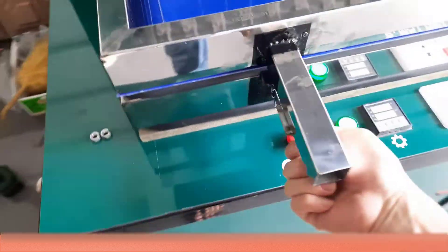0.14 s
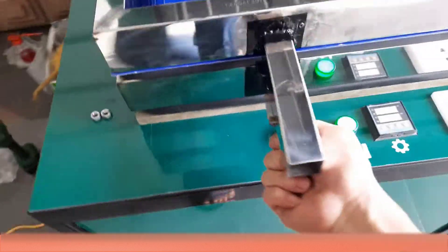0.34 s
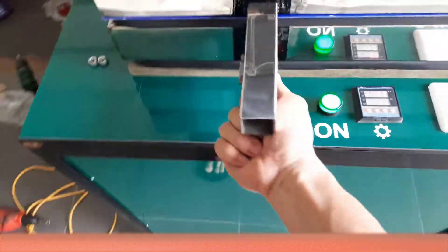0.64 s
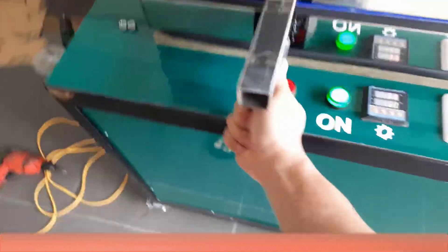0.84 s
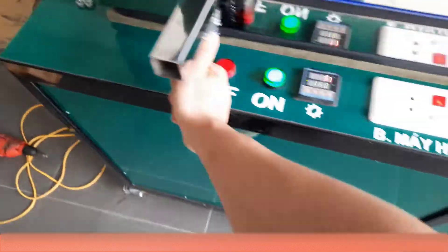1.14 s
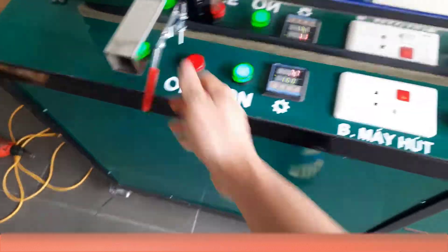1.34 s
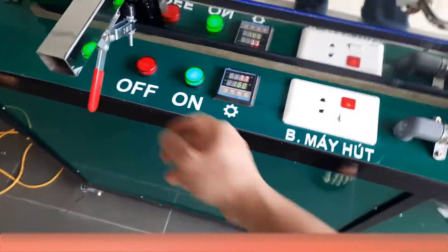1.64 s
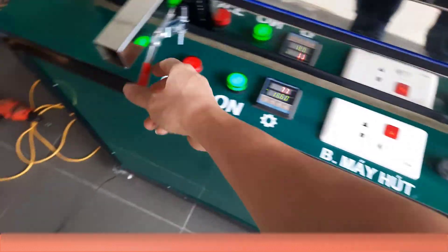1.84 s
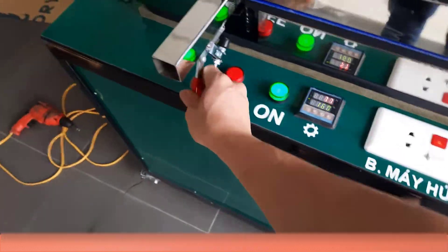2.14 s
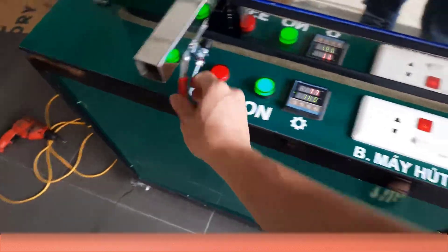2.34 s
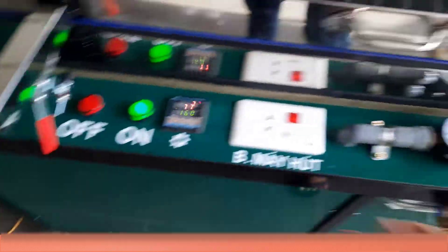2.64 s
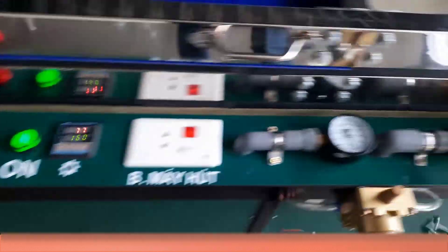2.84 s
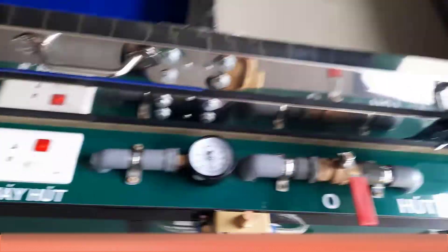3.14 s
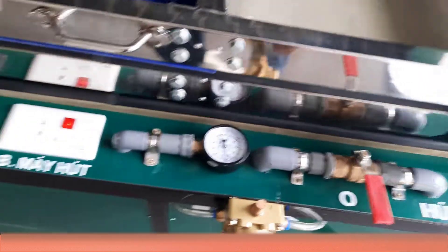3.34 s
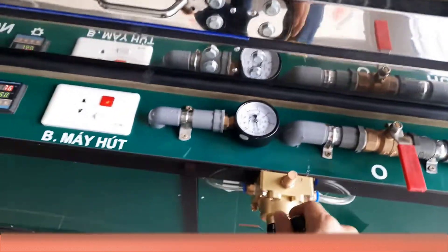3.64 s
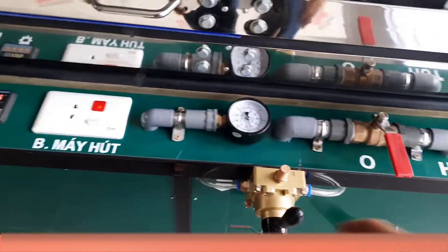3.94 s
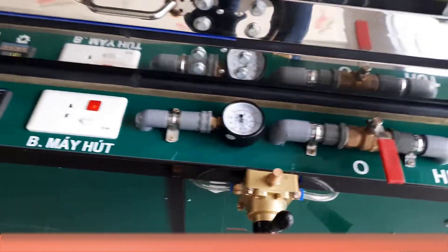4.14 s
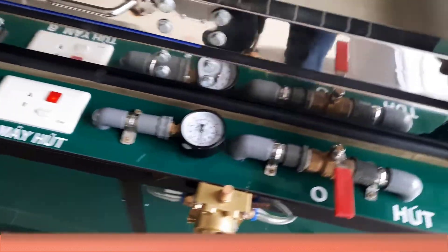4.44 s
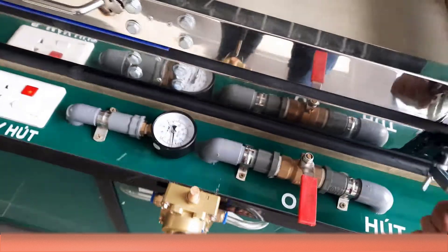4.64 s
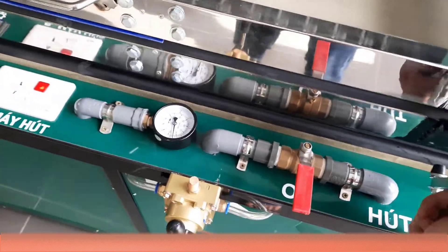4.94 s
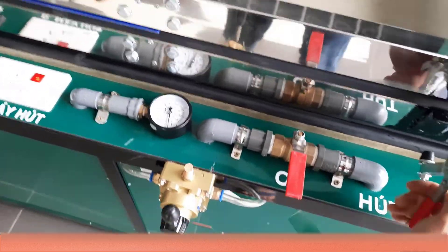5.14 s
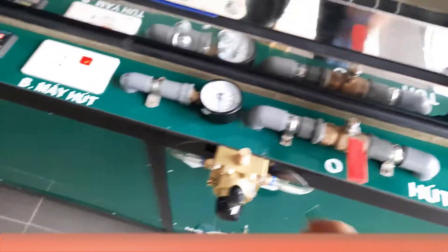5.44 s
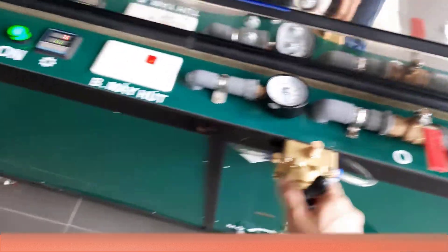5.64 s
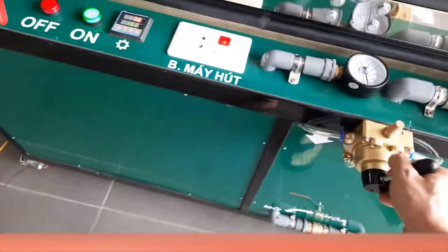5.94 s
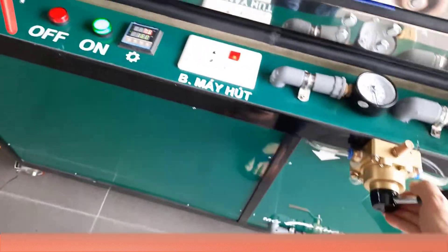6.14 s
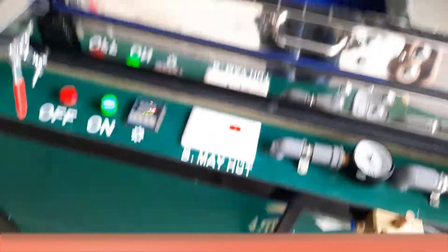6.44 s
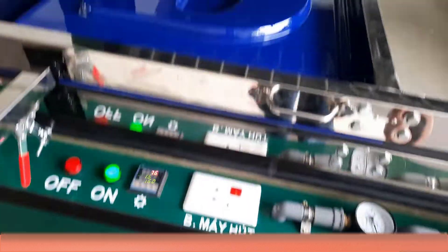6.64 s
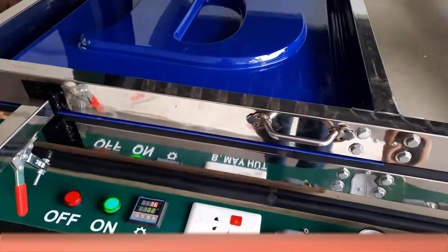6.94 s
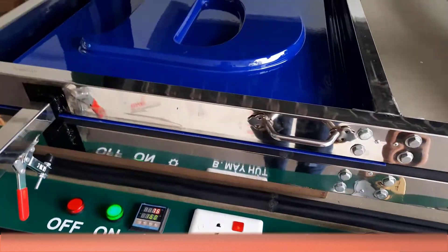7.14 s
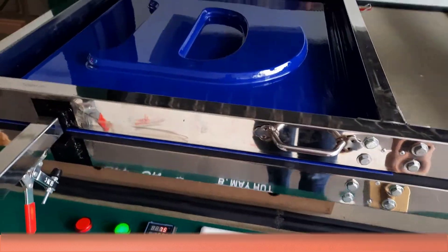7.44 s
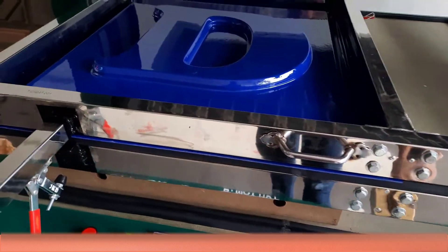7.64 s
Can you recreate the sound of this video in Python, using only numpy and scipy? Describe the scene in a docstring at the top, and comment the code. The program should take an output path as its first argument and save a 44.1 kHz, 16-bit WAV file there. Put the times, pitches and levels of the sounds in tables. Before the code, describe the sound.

A workshop hums with low machine rumble and fan rush, slightly left; a motor hum slowly grows. From 0.2 s come soft puffs of thin hiss and light metal ticks. At 0.78 s a steel frame slams hard, ringing, shuddering low and chattering until about 1.1 s, followed by latch knocks, rubbing and tiny squeaks to 1.45 s, and a faint knock at 1.57. At 2.75 s a valve thumps and compressed air blasts out, roaring and buffeting the close microphone, stopping abruptly at 3.53. A thump and click follow at 3.63, a lesser click at 3.92, a sharp ringing fitting click at 4.64. The ducked background slowly returns. Faint bumps, rubs and puffs run from 5.3 to 6.15. At 6.2 s a bright, steady air jet opens with a tiny toot and hisses to the end at 7.8, its colour shifting as the microphone swings away, with gusts on it.

```python
"""Clamping frame and compressed air

In a workshop a steel clamping frame is shut on a forming machine and latched with a lever: struck metal modes.
A valve thumps and lets out a blast of air, a fitting clicks, soft puffs of thin hiss come and go, then a
brass valve opens into a steady jet: all the air is shaped noise. It buffets the two-port microphone held
close by, whose gain control ducks the workshop after the blast and slowly lets it back."""
import sys
import numpy as np
from scipy import signal
from scipy.fft import rfft, irfft, next_fast_len
from scipy.io import wavfile
from scipy.ndimage import uniform_filter1d, minimum_filter1d, map_coordinates

SR = 44100
rng = np.random.default_rng(int(sys.argv[2]) if len(sys.argv) > 2 else 0)


def transcribe(signal):
    """Save signal, clipped to [-1, 1], as a 16-bit WAV file at the path in sys.argv[1]."""
    frames = np.atleast_2d(signal).T
    limited = np.clip(frames, -1, 1)
    pcm = np.round(limited * 32767).astype(np.int16)
    wavfile.write(sys.argv[1], SR, pcm)


N = 343539
TIME = np.arange(N) / SR


def from_db(db):
    """Decibels to gain."""
    return np.exp(np.asarray(db) * (np.log(10) / 20))


def rms_one(x):
    """Scale to unit power."""
    return x / np.sqrt(np.mean(x ** 2) + 1e-20)


def in_time(rows):
    """Each column of a curve, interpolated at every sample."""
    s, *columns = np.transpose(rows)
    return [np.interp(TIME, s, column) for column in columns]


def at_hz(points, hz):
    """Read a table on a log-frequency axis."""
    table_hz, value = np.transpose(points)
    return np.interp(np.log(np.maximum(hz, 1)), np.log(table_hz), value)


def colour(x, spectrum):
    """Filter by a table of (frequency [Hz], gain [dB])."""
    length = x.shape[-1]
    size = next_fast_len(length)
    gain = from_db(at_hz(spectrum, np.fft.rfftfreq(size, 1 / SR)))
    return irfft(rfft(x, size) * gain, size)[..., :length]


def noise(spectrum, alike=0):
    """Coloured stereo noise of unit power with a share common to both sides."""
    size, alike = next_fast_len(N, real=True), np.clip(alike, 0, 1)
    pairs = rng.standard_normal((3, size // 2 + 1, 2), dtype=np.float32)
    white = pairs.view(np.complex64)[..., 0]
    gain = from_db(at_hz(spectrum, np.fft.rfftfreq(size, 1 / SR)))
    mixed = np.sqrt(alike) * white[0] + np.sqrt(1 - alike) * white[1:]
    return rms_one(irfft((mixed * gain).astype(np.complex64), size)[:, :N].astype(float))


def drift(rate):
    """Smooth chance of zero mean and unit spread, changing so many times a second."""
    return np.interp(TIME * rate, np.arange(8000), rng.standard_normal(8000)) * np.sqrt(3 / 2)


def pan(left_db):
    """Gains of the two sides, left above right by so many dB."""
    return from_db(np.array([[.5], [-.5]]) * left_db)


def gate(start, end, rise, fall):
    """Open in a short ramp and die away after the end."""
    return np.clip((TIME - start) / rise, 0, 1) * np.exp(-np.clip((TIME - end) / fall, 0, 20))


def convolve(x, response):
    """Pass a sound through a stereo response."""
    return signal.fftconvolve(np.atleast_2d(x), response, axes=-1)[:, :N]


def late(x, ms):
    """Delay by a fixed or changing time, as a longer path to the microphone does."""
    return map_coordinates(x, [np.arange(N) - ms * SR / 1000], order=3)


def resonance(x, hz, width_hz):
    """Ring one resonance; unit power."""
    return rms_one(signal.lfilter(*signal.iirpeak(hz, hz / width_hz, fs=SR), x))


# rumble of the machines: (frequency [Hz], density [dB per Hz])
RUMBLE_COLOUR = [(15, -38), (25, -10.5), (43, -2.5), (70, -0.5), (102, 2.5), (124, -4.5), (157, -1.5),
                 (208, -14.5), (299, -3.5), (358, -9), (584, -14), (700, -25), (910, -46), (1540, -120)]
# rush of the fans further off: (frequency [Hz], density [dB per Hz])
RUSH_COLOUR = [(350, -19.5), (600, -1.5), (1300, -3.5), (2500, -7.5), (3300, -16), (6500, -24.5),
               (9400, -32), (13000, -32), (15500, -56.5)]
RUMBLE_DB, RUSH_DB = -41.5, -47.5
# a distant motor hum slowly grows, as the microphone moves along the machine towards it
HUM_FAR_DB, HUM_NEAR_DB, HUM_REACHED_S = -63.5, -46.5, 6


def workshop():
    """Machines rumble steadily as low noise, a motor hum slowly grows, fans rush further off to the left."""
    hum_db = HUM_FAR_DB + (HUM_NEAR_DB - HUM_FAR_DB) * np.minimum(TIME / HUM_REACHED_S, 1)
    motor = resonance(resonance(rng.standard_normal(N), 387, 45), 387, 45)
    hum = from_db(hum_db) * motor
    rumble = from_db(RUMBLE_DB) * noise(RUMBLE_COLOUR, alike=0.94) * pan(1.8)
    rush = from_db(RUSH_DB) * noise(RUSH_COLOUR, alike=0.16) * pan(5.1)
    left, right = hum + rush
    return rumble + np.array([late(left, 0.37), right])


# short soft puffs of hiss: (start [s], length [s], level [dB])
PUFFS = [(0.187, 0.051, -55), (0.357, 0.13, -55), (0.522, 0.16, -60), (.7, 0.17, -48), (1.11, 0.12, -52.5),
         (1.227, 0.12, -48.5), (1.498, 0.072, -44.5), (1.65, 0.047, -51), (2.13, 0.085, -50.5),
         (2.248, 0.11, -69), (2.576, 0.13, -57.5), (4.141, 0.1, -51.5), (5.674, 0.19, -47.5),
         (5.875, 0.26, -39)]
# their thin, rustling hiss: (frequency [Hz], density [dB per Hz])
PUFF_COLOUR = [(700, -21.5), (1200, -9), (2000, -5.5), (3200, -9), (4300, -14), (6500, -9.5), (9500, -8.5),
               (13300, -8.5), (16000, -18.5)]
PUFF_RISE_SHARE, PUFF_FALL_S = 0.42, 0.054


def puffs():
    """Short soft puffs of thin, rustling hiss, made of gated noise; weak ones are duller."""
    level = sum(from_db(db) * gate(s, s + length, PUFF_RISE_SHARE * length, PUFF_FALL_S)
                for s, length, db in PUFFS)
    hiss = noise(PUFF_COLOUR, alike=0.15) * pan(3.0)
    dull = colour(hiss, [(6000, 4.5), (9000, -9.5), (15000, -12.5)])
    bright = np.minimum(level / from_db(-44), 1)
    return level * from_db(1.0 * drift(40)) * (bright * hiss + (1 - bright) * dull)


def struck(blows, modes, spectrum, body_db, crack_db, modes_db, body_t60, crack_t60):
    """Each contact gives a crack, a dense wash of sheet-metal modes and a few clear ones."""
    t, force = TIME[:SR], np.zeros(N)
    for s, level_db, hz in blows:
        softness = signal.butter(1, min(hz, .45 * SR), fs=SR, output="sos")
        pulse = signal.sosfilt(softness, signal.unit_impulse(256))
        force[round(s * SR):][:len(pulse)] += from_db(level_db) * pulse
    dense = rms_one(colour(rng.standard_normal((2, SR)), spectrum))
    dense *= from_db(body_db - 60 * t / body_t60) + from_db(crack_db - 60 * t / crack_t60)
    clear = sum(from_db(modes_db + db - 60 * t / t60) * np.sin(2 * np.pi * hz * t)
                for hz, db, t60 in modes)
    return convolve(force, dense + clear)


# blows of frame and latch: (time [s], level [dB], contact brightness [Hz])
KNOCKS = [(.369, -25, 2430), (.396, -23.5, 2545), (.541, -28, 5050), (.771, -11, 5010), (.7775, 5, 12500),
          (.792, -0.5, 1790), (.800, -6.5, 5000), (1.128, -20.5, 3500), (1.156, -17, 2500),
          (1.5694, -18, 3960)]
# clear modes of the steel frame: (frequency [Hz], relative level [dB], t60 [s])
FRAME_MODES = [(100, -0.5, 0.41), (319, -3, 0.3), (997, -14, 0.4), (1374, -8, 0.25), (1940, -11, 0.15),
               (2810, -28, 0.21)]
# its dense wash: (frequency [Hz], density [dB per Hz])
FRAME_COLOUR = [(30, -39.5), (50, -8), (105, -4.5), (180, -6), (300, -1.5), (650, -15), (1000, -12),
                (1150, -13), (1600, -4), (2400, -15), (6000, -16.5), (16000, -23.5)]


def frame_knocks():
    """The steel frame slams and its latch knocks, ringing the frame's modes."""
    return struck(KNOCKS + chatter(count=6), FRAME_MODES, FRAME_COLOUR, body_db=-23.0, crack_db=-10.5,
                  modes_db=-29.5, body_t60=0.54, crack_t60=0.028)


# the struck parts lie to the left of the microphone: (frequency [Hz], left minus right [dB])
HITS_LEAN = [(100, 1), (450, 1.8), (1400, 6.5), (4500, 4), (12000, 3)]


def lean_left(x):
    """The left port hears more of the struck parts, chiefly above the bass."""
    return np.array([colour(side, [(hz, share * db) for hz, db in HITS_LEAN])
                     for side, share in zip(x, (.5, -.5))])


# decay of the room: (frequency [Hz], t60 [s])
ROOM_T60 = [(100, 1), (500, 1), (2000, 0.76), (6000, 0.77), (15000, 0.62)]


def room_response():
    """Diffuse reflections of unit energy; the treble dies first."""
    t, centres = TIME[:SR], np.geomspace(60, 16000, 9)
    white, hz = rfft(rng.standard_normal((2, SR))), np.arange(SR // 2 + 1)
    tail = 0
    for f, share in zip(centres, np.eye(len(centres))):
        band = irfft(white * np.interp(hz, centres, share), SR)
        tail = tail + band * from_db(-60 * t / at_hz(ROOM_T60, f))
    return rms_one(tail * np.minimum(t / 0.0072, 1)) / np.sqrt(SR)


# the part of the hiss that spreads into the room: (frequency [Hz], gain [dB])
SPREAD = [(300, -22), (900, -29.5), (1800, -16), (6000, -10.5), (9500, -9.5), (15000, -24.5)]


def room_echoes(hits, hiss):
    """Struck metal and spreading hiss return from the room as a diffuse tail."""
    sent = from_db(-11.0) * hits + colour(hiss, SPREAD) * pan(1.5)
    return convolve(sent, room_response())


# metal parts rub under the hand: (middle [s], length [s], frequency [Hz], width [Hz], level [dB])
RUBS = [(0.395, 0.044, 1700, 1300, -46), (0.51, 0.08, 1800, 1300, -52), (1.163, 0.11, 1650, 400, -44.5),
        (1.235, 0.24, 3350, 600, -46), (2.333, 0.092, 2800, 149, -51), (5.29, 0.057, 3960, 700, -52.5),
        (5.726, 0.067, 3300, 500, -45.5), (6.069, 0.076, 3350, 450, -37.5), (6.134, 0.033, 3450, 400, -38)]
# the hand bumps the regulator and its panel: (middle [s], length [s], frequency [Hz], width [Hz], level [dB])
BUMPS = [(5.323, 0.039, 306.1, 39.4, -42), (5.655, 0.035, 290, 49.2, -40), (5.698, 0.05, 130, 60, -39),
         (6.132, 0.18, 148, 50, -39.5)]


def handling():
    """Uneven slips excite one resonance in each short stroke."""
    out, t = np.zeros((2, N)), TIME[:SR // 2] - 1 / 4
    grip = from_db(3 * drift(90))
    for s, length, hz, width_hz, level_db in RUBS + BUMPS:
        first = round((s + t[0]) * SR)
        span = slice(first, first + len(t))
        slips = rng.standard_normal((2, len(t))) * grip[span]
        stroke = np.exp(-(2 * t / length) ** 2)
        out[:, span] += from_db(level_db) * stroke * resonance(slips, hz, width_hz)
    return out


# each push on the frame sets a panel shuddering: (start [s], length [s], pitch [Hz], level [dB])
PUSHES = [(0.799, 0.038, 100.6, -14.5), (0.866, 0.064, 99, -22.5), (0.957, 0.062, 98.3, -23),
          (0.993, 0.1, 128.4, -24), (1.13, 0.036, 123, -29.5), (1.216, 0.1, 97, -35)]
SHUDDER_RISE_S, SHUDDER_FALL_S = 0.014, 0.033
SHUDDER_ROUGH_DB, SHUDDER_JITTER = 2.0, .06  # jitter as a share of the pitch


def frame_shudder():
    """Pressed down, the frame shudders in low tones of uneven pitch and level."""
    turns = 2 * np.pi * np.cumsum(1 + SHUDDER_JITTER * drift(61.3)) / SR
    shudder = 0
    for s, length, hz, level_db in PUSHES:
        push = from_db(level_db) * gate(s, s + length, SHUDDER_RISE_S, SHUDDER_FALL_S)
        shudder = shudder + push * np.sin(hz * turns)
    return shudder * from_db(SHUDDER_ROUGH_DB * drift(69.8))


CHATTER_FROM_S, CHATTER_S, CHATTER_HZ = .81, .25, 700
CHATTER_DB, CHATTER_FALL_DB_PER_S = -15.5, 42


def chatter(count):
    """The loose frame chatters after the slam: light, uneven rebounds that die away."""
    blows = []
    for t in CHATTER_S * rng.random(count):
        level_db = CHATTER_DB - CHATTER_FALL_DB_PER_S * t + rng.normal(0, 2)
        blows.append((CHATTER_FROM_S + t, level_db, CHATTER_HZ * 2 ** rng.normal(0, .5)))
    return blows


# dry pivots turn in the lever and a tap: (start [s], length [s], start pitch [Hz], end pitch [Hz], level [dB])
SQUEAKS = [(1.14, 0.074, 1400, 1540, -49), (1.163, .13, 3600, 3710, -52), (1.266, 0.049, 1405, 1370, -44.5),
           (1.33, 0.046, 1330, 1375, -48), (1.397, .05, 1370, 1310, -54), (5.387, 0.094, 1272, 1255, -55)]
SQUEAK_WOBBLE, SQUEAK_ROUGH_DB = .008, 2.5  # wobble as a share of the pitch


def squeaks():
    """Stick and slip sings a thin, wobbling, gliding tone."""
    out, wobble = 0, 1 + SQUEAK_WOBBLE * drift(90)
    for s, length, from_hz, to_hz, level_db in SQUEAKS:
        hz = np.interp(TIME, [s, s + length], [from_hz, to_hz]) * wobble
        tone = np.sin(2 * np.pi * np.cumsum(hz) / SR)
        out = out + from_db(level_db) * gate(s, s + length, 0.01, .01) * tone
    return out * from_db(SQUEAK_ROUGH_DB * drift(80))


# blows of the valve piston: (time [s], level [dB], contact brightness [Hz])
THUMPS = [(2.7545, 3.5, 2600), (2.7605, -1.5, 7920), (2.7632, 2.5, 450), (2.7745, -0.5, 600),
          (3.629, -6, 4028)]
# its clear modes: (frequency [Hz], relative level [dB], t60 [s])
PISTON_MODES = [(401, -0.5, 0.15), (460, 2, 0.18), (800, -5, .09), (1280, -8, .05), (2180, -7, .04)]
# its dense wash: (frequency [Hz], density [dB per Hz])
PISTON_COLOUR = [(80, -19), (205, -15), (441, -4), (650, -10.5), (1000, -10.5), (1400, -11), (1900, -5),
                 (2600, -13), (3200, -27), (6000, -23.5), (15000, -36.5)]


def valve_piston():
    """The piston thumps at each end of its stroke, ringing the valve's short modes."""
    return struck(THUMPS, PISTON_MODES, PISTON_COLOUR, body_db=-24.0, crack_db=-24.5,
                  modes_db=-29.0, body_t60=0.11, crack_t60=0.021)


def buffeting(spectrum, lumpy_db, rate):
    """Eddies hit each microphone port separately."""
    lumps = from_db(lumpy_db * np.array([drift(rate), drift(rate)]))
    return rms_one(noise(spectrum) * lumps)


# first spit of the blast: (frequency [Hz], density [dB per Hz])
SPIT_COLOUR = [(1500, -15.5), (5500, 0.5), (8000, -5.5), (15000, -5)]
# hiss of the outrush: (frequency [Hz], density [dB per Hz])
BLAST_HISS_COLOUR = [(290, -25), (500, -12.5), (800, -2), (1840, -2), (2390, -3.5), (5880, -8.5),
                     (7500, -11.5), (8800, -14), (9500, -11), (11100, -6.5), (14500, -5), (16000, -8.5)]
# wind of the blast on the microphone: (frequency [Hz], density [dB per Hz])
BLAST_WIND_COLOUR = [(15, -46.5), (25, -22.5), (70, -4), (130, -4), (184, -5), (253, -5.5), (303, 2.5),
                     (436, -5), (700, -9.5), (910, -39.5), (1540, -120)]
# rasp of the stream on the microphone: (frequency [Hz], density [dB per Hz])
RASP_COLOUR = [(200, -15.5), (400, 1.5), (1100, 0), (2200, -5), (3500, -13), (7000, -35.5)]
# the stream sweeps over the microphone: (time [s], relative level [dB])
BLAST_GUSTS = [(2.8, -9.5), (2.87, -2.5), (2.975, 1), (3.012, 4.5), (3.04, 2.5), (3.15, 1.5), (3.33, -3.5),
               (3.46, -1.5), (3.52, -8)]
BLAST_OPEN_S, BLAST_SHUT_S = 2.7925, 3.526
# the blast swells to a crest, then sags as the stored air runs out
BLAST_CREST_S, BLAST_SWELL_DB_PER_S, BLAST_SAG_DB_PER_S = 2.92, 31, 3
BLAST_HISS_DB, BLAST_WIND_DB, BLAST_SPIT_DB, BLAST_RASP_DB = 5, -2, 6.5, -3.5


def blast():
    """Stored pressure spits first, then rushes out; the stream hits the microphone in gusts."""
    past_crest = TIME - BLAST_CREST_S
    is_open = gate(BLAST_OPEN_S, BLAST_SHUT_S, 0.019, 0.005)
    flow_db = np.minimum(BLAST_SWELL_DB_PER_S * past_crest, -BLAST_SAG_DB_PER_S * past_crest)
    flow = from_db(flow_db) * is_open
    spit_gate = gate(BLAST_OPEN_S, 2.801, 0.0074, 0.0066)
    spit = from_db(BLAST_SPIT_DB) * spit_gate * noise(SPIT_COLOUR, alike=0.18)
    hiss = from_db(BLAST_HISS_DB + 0.61 * drift(70)) * noise(BLAST_HISS_COLOUR, alike=0.043)
    wind_gate = gate(BLAST_OPEN_S, BLAST_SHUT_S, 0.022, 0.01)
    wind = from_db(BLAST_WIND_DB) * wind_gate * noise(BLAST_WIND_COLOUR) * pan(-2.5)
    rasp_gain = from_db(BLAST_RASP_DB + in_time(BLAST_GUSTS)[0])
    rasp = rasp_gain * buffeting(RASP_COLOUR, lumpy_db=3, rate=110)
    return flow * hiss + spit, wind + is_open * rasp


# contacts of the pipe fittings: (time [s], level [dB], contact brightness [Hz])
CLICKS = [(3.64, -5.5, 2490), (3.917, -10.5, 2530), (4.522, -30.5, 6030), (4.633, -2, 8980),
          (4.6365, 12.5, 14000), (4.650, 12.5, 1300), (5.264, -26.5, 9150)]
# their clear modes: (frequency [Hz], relative level [dB], t60 [s])
FITTING_MODES = [(109, -19, 0.83), (334, -8.5, 0.13), (1260, -11, 0.2), (1289, -13, 0.25),
                 (1360, -13, 0.21), (1492, -23, 0.27), (1780, -33, .2), (1960, -26, 0.2), (2450, -9, 0.092)]
# their dense wash: (frequency [Hz], density [dB per Hz])
FITTING_COLOUR = [(60, -31), (120, -1), (210, -13), (350, 7), (560, -9), (1050, -8), (1280, 10.5),
                  (1500, 1.5), (1800, -1), (2450, -9), (3500, -9), (8000, -15), (16000, -14.5)]


def pipe_fittings():
    """Fittings click under the hand, ringing the modes of the pipework."""
    return struck(CLICKS, FITTING_MODES, FITTING_COLOUR, body_db=-25.0, crack_db=-22.0,
                  modes_db=-23.0, body_t60=0.18, crack_t60=0.023)


# steel surfaces around the valve each return a faint echo, whose path lengthens with the swing
GLINT_MIN_MS, GLINT_MAX_MS, GLINT_STRETCH, GLINT_DB = 1.0, 4, .1, -11.5
SWAY_MS, SWAYS_PER_S = .018, 5


def glints(x, place, count):
    """Add faint echoes off nearby steel: fine ripples in the hiss that slide as the microphone swings."""
    echoes = 0
    for ms in rng.uniform(GLINT_MIN_MS, GLINT_MAX_MS, count):
        path_ms = ms * (1 + GLINT_STRETCH * place) + SWAY_MS * drift(SWAYS_PER_S)
        echoes = echoes + late(x, path_ms)
    return x + from_db(GLINT_DB) * echoes


# the microphone's swing: (time [s], place: 0 in front, 1 aside, 2 at rest)
SWING = [(6.2, 0), (6.38, 0.073), (6.56, 0.38), (6.7, 0.97), (6.92, 1.07), (7.12, 1.904)]
# jet with the microphone right in front of the valve: (frequency [Hz], left [dB], right [dB])
JET_CLOSE = [(500, -24, -37), (1390, -20, -30), (2070, -2.5, -8), (3050, -11, -16), (3950, -5, -9),
             (4600, -3, -7), (5020, -7.5, -8), (5550, -19, -21), (6330, 1, -1.5), (7030, -6, -5.5),
             (7600, -10, -9), (8500, 1, -10), (9640, -25, -23), (10900, -11.5, -14), (12400, -14, -18),
             (15500, -30, -30)]
# jet with the microphone swung aside: (frequency [Hz], left [dB], right [dB])
JET_ASIDE = [(500, -21, -37), (1380, -13.5, -27), (2340, -4.5, -20), (3500, -7, -5), (4200, -15, -15),
             (5360, -2, -3.5), (6350, -14, -15), (7100, -4.5, -12), (8400, -7, -9), (9800, -13.5, -22),
             (11100, -13, -5), (12200, -6.5, -17), (13100, -14, -3), (14400, -18, -21), (15400, -15.5, -8)]
# jet with the microphone at rest above the machine: (frequency [Hz], left [dB], right [dB])
JET_RESTING = [(500, -14.5, -25.5), (1380, -12.5, -24), (1870, -5, -12), (2600, -9.5, -25.5),
               (3750, -7, -4), (5030, -8.5, -10.5), (6460, -9.5, -11.5), (7460, -6.5, -10), (8500, -4, -8),
               (9800, -17, -16), (11100, -8, -6), (11900, -12, -21), (12800, -21, -7), (14200, -22, -21),
               (15300, -15, -10)]
# bearing of the jet as the microphone swings away: (time [s], left port later by [ms])
JET_BEARING = [(6.2, 0.2), (6.45, 0.18), (6.7, 0.15), (6.87, 0.16), (7.15, 0.15), (7.8, 0.15)]


def jet_paths(source):
    """The colour at each port changes as the microphone swings; the left port hears the jet later."""
    place = np.clip(in_time(SWING)[0], 0, 2)
    ports = []
    for port in (1, 2):
        heard = 0
        for k, table in enumerate((JET_CLOSE, JET_ASIDE, JET_RESTING)):
            nearness = np.maximum(1 - abs(place - k), 0)
            heard = heard + nearness * colour(source, np.array(table)[:, [0, port]])
        ports.append(glints(heard, place, count=4))
    left, right = ports
    return np.array([late(left, in_time(JET_BEARING)[0]), right])


# a narrow, sliding, unsteady notch in the jet's hiss: (time [s], frequency [Hz])
NOTCH = [(6.2, 2950), (6.4, 3060), (6.57, 3430), (6.68, 4080), (6.85, 4260), (7.1, 3550), (7.4, 3530),
         (7.79, 3720)]
NOTCH_WIDTH_HZ, NOTCH_DEPTH = 500, .85  # a depth of 1 cuts fully
# the notch wavers at random in frequency and depth
NOTCH_JITTER_HZ, NOTCH_FLICKER, CHANGES_PER_S = 200, .45, 22


def sliding_notch(x, size):
    """Cut a narrow, unsteady notch, block by block, by taking away a band of the sound."""
    band, state = np.zeros_like(x), np.zeros((2, 2))
    hz = in_time(NOTCH)[0] + NOTCH_JITTER_HZ * drift(CHANGES_PER_S)
    for i in range(0, N, size):
        b, a = signal.iirpeak(hz[i], hz[i] / NOTCH_WIDTH_HZ, fs=SR)
        band[:, i:i + size], state = signal.lfilter(b, a, x[:, i:i + size], zi=state)
    depth = np.clip(NOTCH_DEPTH + NOTCH_FLICKER * drift(CHANGES_PER_S), 0, 1)
    return x - depth * band


# sizzle of the spreading stream: (frequency [Hz], density [dB per Hz])
SIZZLE_COLOUR = [(400, -3.5), (900, -2.5), (2500, 3), (5000, 0), (9000, 0), (13000, 3), (15500, -1.5),
                 (16000, -23)]
# wind of the jet on the microphone: (frequency [Hz], density [dB per Hz])
JET_WIND_COLOUR = [(15, -50), (25, -48), (54, -0.5), (98, 1), (162, -0.5), (219, -7.5), (305, -1),
                   (575, -11.5), (1100, -15.5), (1600, -18), (2400, -24), (4000, -120)]
# air through the valve: (time [s], relative level [dB])
JET_FLOW = [(6.21, 0), (6.29, 1.5), (6.32, -1.5), (6.36, 1.5), (6.55, -0.5), (6.68, -0.5), (6.77, 2),
            (6.84, -1), (6.95, 0.4), (7.1, -0.25), (7.79, -0.5)]
# how hard its stream strikes the microphone: (time [s], relative level [dB])
JET_GUSTS = [(6.21, -41), (6.285, -12), (6.32, -0.5), (6.37, 2.5), (6.52, 2), (6.66, 2.5), (6.735, -6),
             (6.815, 4.5), (6.9, -4.5), (6.98, 1), (7.02, -5.5), (7.13, 2.5), (7.19, -5.5), (7.27, -0.5),
             (7.32, -2), (7.4, -0.5), (7.65, -0.5), (7.77, 2.5)]
JET_OPEN_S, JET_SIZZLE_BUILD_S = 6.205, 0.13
JET_HISS_DB, JET_SIZZLE_DB, JET_WIND_DB = 1.5, -8.5, -20.5
JET_DRAUGHT_DB = -25  # the sheltered left port gets mostly an even draught
# the jet starts with a short toot of the pipe
TOOT_HZ, TOOT_WIDTH_HZ, TOOT_S, TOOT_DB = 2100, 86, 0.013, -14.5


def jet():
    """A point source of hiss opens at once; the sizzle of its spreading stream and the wind follow."""
    age = np.maximum(TIME - JET_OPEN_S, 0)
    is_open = gate(JET_OPEN_S, N / SR, 0.018, .0075)
    rush = from_db(JET_HISS_DB) * jet_paths(rng.standard_normal(N))
    build = 1 - np.exp(-age / JET_SIZZLE_BUILD_S)
    sizzle = from_db(JET_SIZZLE_DB) * build * noise(SIZZLE_COLOUR) * pan(0.98)
    toot_gate = gate(JET_OPEN_S, JET_OPEN_S + TOOT_S, 0.0025, 0.0054)
    toot = from_db(TOOT_DB) * toot_gate * resonance(rng.standard_normal(N), TOOT_HZ, TOOT_WIDTH_HZ)
    flow = from_db(in_time(JET_FLOW)[0] + .5 * drift(50))
    hiss = sliding_notch(rush + sizzle, size=256) * flow + toot
    gusts = from_db(JET_WIND_DB + in_time(JET_GUSTS)[0] + .5 * drift(9.2))
    wind = gusts * buffeting(JET_WIND_COLOUR, lumpy_db=2.5, rate=90) * pan(-23.5)
    draught = from_db(JET_DRAUGHT_DB) * noise(JET_WIND_COLOUR) * pan(9.0)
    return is_open * hiss, is_open * (wind + draught)


def scene():
    """Knocks and hiss ring in the room; wind on the ports does not."""
    blast_hiss, blast_wind = blast()
    jet_hiss, jet_wind = jet()
    hits = lean_left(frame_knocks() + handling() + squeaks() + valve_piston() + pipe_fittings())
    hiss = blast_hiss + jet_hiss
    direct = hits + frame_shudder() + hiss + blast_wind + jet_wind
    return direct + room_echoes(hits, hiss) + puffs() + workshop()


def gain_control(x, limit_db, hold_s, release_s):
    """Loud sound above the rumble pulls the gain down at once; it waits, then creeps back ever more slowly."""
    sensed = signal.sosfilt(signal.butter(2, 600, "high", fs=SR, output="sos"), x)
    power = uniform_filter1d(np.mean(sensed ** 2, axis=0), size=160)
    excess_db = np.maximum(10 * np.log10(np.maximum(power, 1e-12)) - limit_db, 0)
    size = int(hold_s * SR)
    # the largest excess within the hold time
    held_db = -minimum_filter1d(-excess_db, size, origin=(size - 1) // 2, mode="constant")
    fade = np.exp(-TIME / release_s)
    cut_db = np.maximum.accumulate(held_db / fade) * fade
    return x * from_db(-uniform_filter1d(cut_db, size=64))


# the right microphone port has a deep notch: (frequency [Hz], gain against the left [dB])
RIGHT_PORT = [(100, 0.5), (1500, -1.5), (2800, -1), (5500, 2), (7400, 2.5), (8600, -5.5), (9450, -20),
              (10400, -7), (12000, -5), (14500, 0)]
CUTOFF_HZ = 15900


def record(dry):
    """The microphone adds its port colour, gain control and a steep top cut."""
    ports = np.array([dry[0], colour(dry[1], RIGHT_PORT)])
    heard = gain_control(ports, limit_db=-12.5, hold_s=1.353, release_s=0.72)
    return signal.sosfilt(signal.ellip(12, .1, 90, CUTOFF_HZ, fs=SR, output="sos"), heard)


dry = scene()
out = record(dry)
transcribe(out)
```